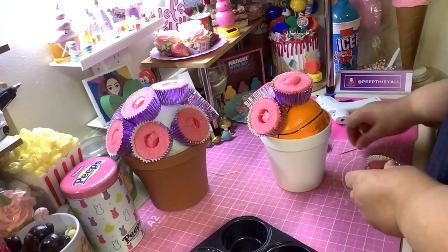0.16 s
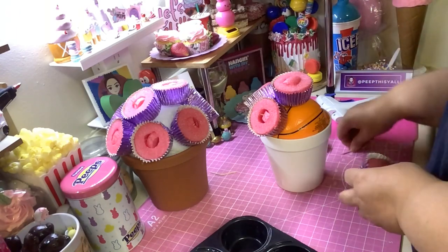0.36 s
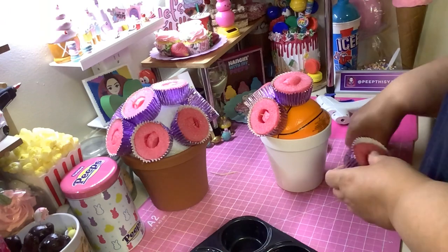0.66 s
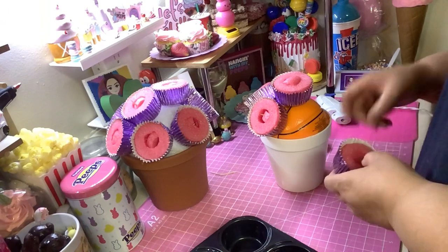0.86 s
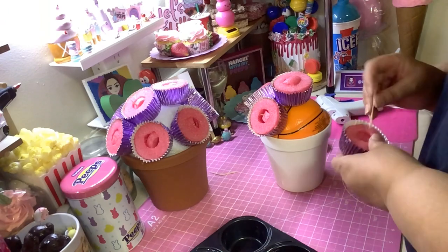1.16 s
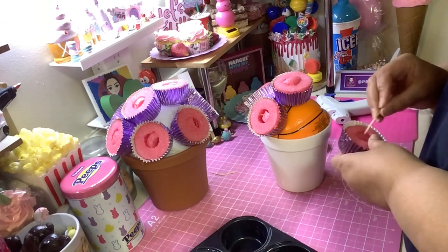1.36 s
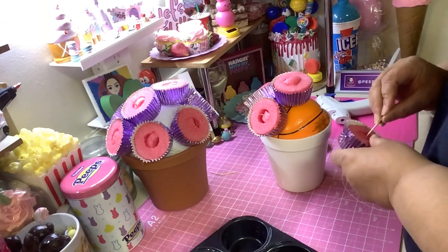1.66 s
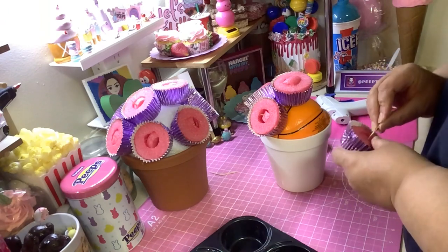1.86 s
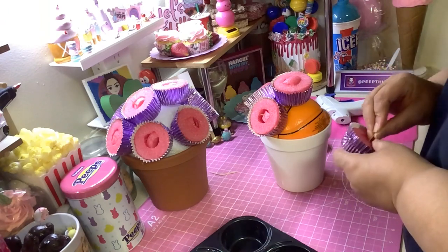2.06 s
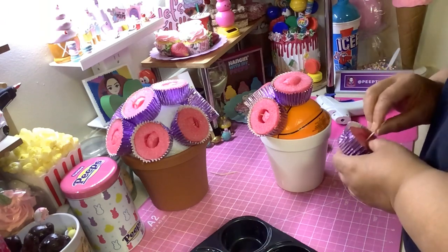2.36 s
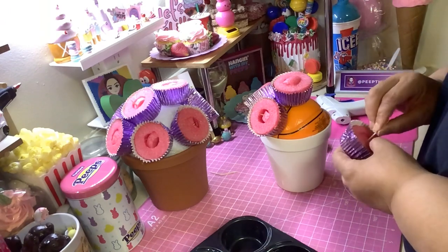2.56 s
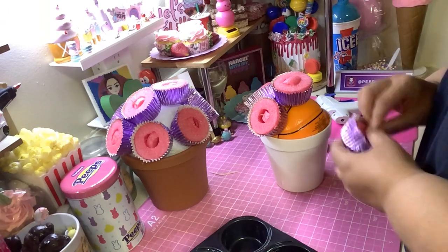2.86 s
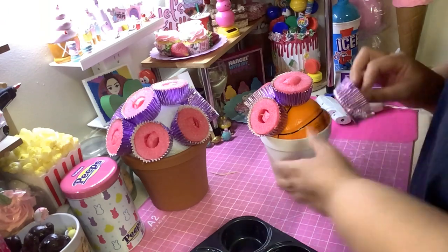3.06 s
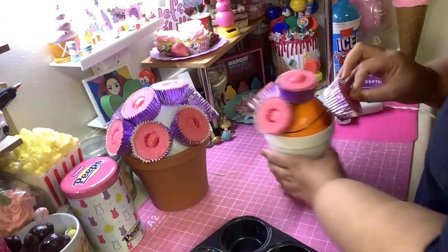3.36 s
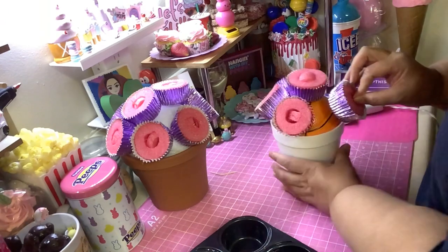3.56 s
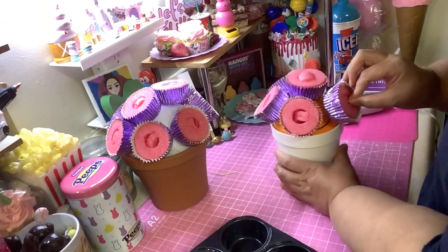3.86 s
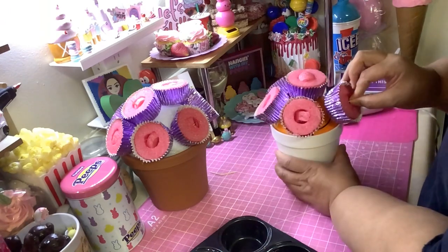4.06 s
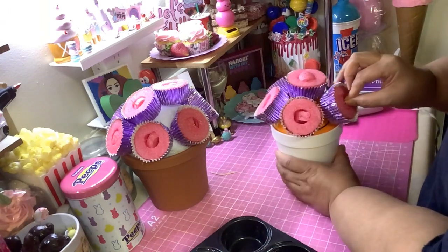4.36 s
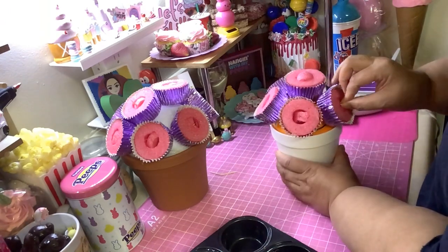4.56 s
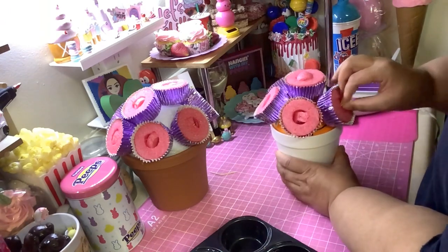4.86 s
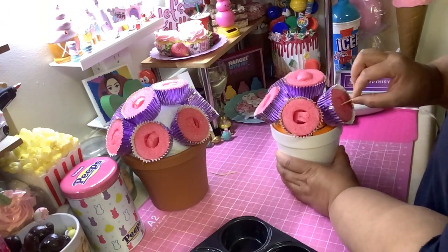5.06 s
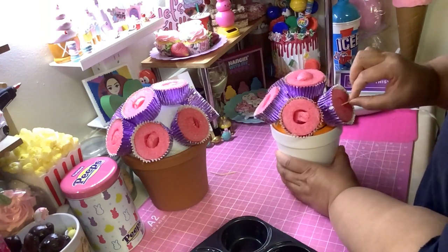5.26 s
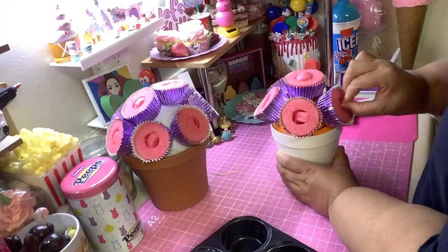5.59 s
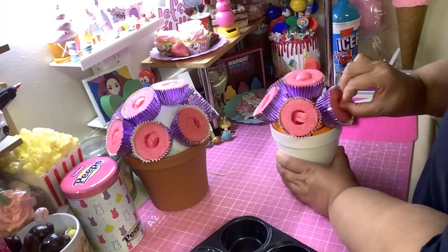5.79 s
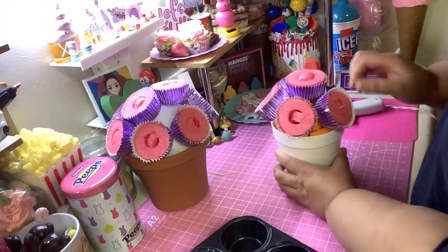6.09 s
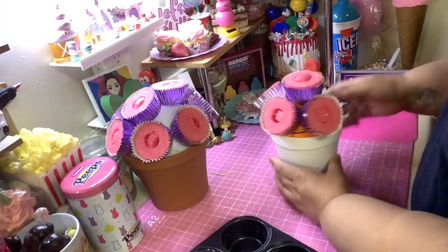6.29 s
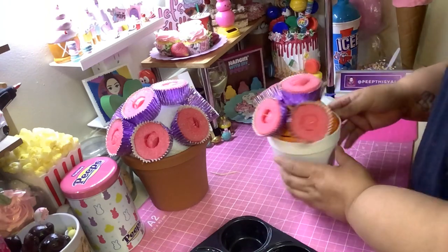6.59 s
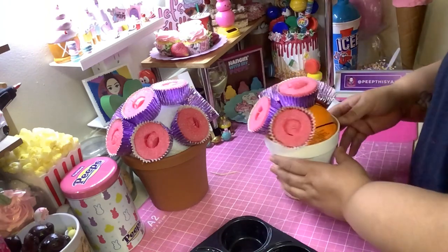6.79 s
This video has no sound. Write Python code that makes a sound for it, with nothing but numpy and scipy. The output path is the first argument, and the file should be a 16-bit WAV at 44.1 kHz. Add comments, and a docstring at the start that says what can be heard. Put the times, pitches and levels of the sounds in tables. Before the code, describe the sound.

Foil cupcake liners crinkle and snap in the fingers while a pot scuffs softly on a table in a quiet room.

```python
"""A small furnished room: foil cupcake liners are handled, pierced with a stick and pressed onto a ball
in a pot. Pleats snap over one by one, each a crack that rings the foil around it. Tiny slips under the
fingers rustle and sizzle, and the hollow cup colours all of the foil. Coarser slips grind under the pot
as it rubs on the table mat. The house murmurs and an appliance hums below."""
import sys
import numpy as np
from scipy import signal
from scipy.fft import rfft, irfft
from scipy.io import wavfile

SR = 44100
rng = np.random.default_rng(int(sys.argv[2]) if len(sys.argv) > 2 else 0)


def dump(signal):
    """Clip the signal to [-1, 1] and save it as 16-bit WAV at the path in sys.argv[1]."""
    limited = np.clip(np.atleast_2d(signal).T, -1, 1)
    pcm = np.round(limited * 32767).astype(np.int16)
    wavfile.write(sys.argv[1], SR, pcm)


N = 305683


def from_db(db):
    """Gain of a level in dB."""
    return 10 ** (np.asarray(db) / 20)


def rms_one(x):
    """Scaled to rms 1."""
    return x / np.sqrt(np.mean(x ** 2) + 1e-20)


def peak_one(x):
    """Scaled to peak 1."""
    return x / np.max(np.abs(x))


def colour(x, spectrum):
    """EQ through a curve of (Hz, dB) points; rms 1."""
    hz, db = np.transpose(spectrum)
    bins = np.maximum(np.fft.rfftfreq(N, 1 / SR), 1)
    curve_db = np.interp(np.log(bins), np.log(hz), db)
    return rms_one(irfft(rfft(x) * from_db(curve_db), N))


def band(x, low_hz, high_hz):
    """Causal band-pass."""
    return signal.sosfilt(signal.butter(3, [low_hz, high_hz], "band", fs=SR, output="sos"), x)


def resonate(x, hz, width_hz):
    """One resonance, gain 1 at its peak."""
    r = np.exp(-np.pi * width_hz / SR)
    gain = (1 - r * r) / 2
    return signal.lfilter([gain, 0, -gain], [1, -2 * r * np.cos(2 * np.pi * hz / SR), r * r], x)


def hollow(x, modes):
    """The sound plus the resonances that a hollow body adds to it."""
    return x + sum(from_db(db) * resonate(x, hz, width_hz) for hz, width_hz, db in modes)


def grains(per_s, spread_db):
    """Random tiny slips of uneven size and sign."""
    sizes = from_db(spread_db * np.minimum(rng.exponential(1, N), 5)) * rng.choice([-1, 1], N)
    return sizes * (rng.random(N) < per_s / SR)


def patches(slips, low_hz, high_hz, centre_hz, q, octaves, skirt_db, count):
    """Slips dealt to many small resonances; those near the moving centre are liveliest; rms 1."""
    dealt, out = rng.integers(0, count, N), 0
    for k, hz in enumerate(np.geomspace(low_hz, high_hz, count)):
        lively = np.exp(-(np.log2(hz / centre_hz) / octaves) ** 2) + from_db(skirt_db)
        ring = resonate(slips * (dealt == k) + 1e-18, hz, hz / q)
        out = out + lively * rms_one(resonate(ring, hz, 3 * hz / q))   # second pass darkens the skirts
    return rms_one(out)


def strokes(rows, fade_db_per_s, rest_hz, rest_db=-120):
    """Gestures swell, hold and fade over a resting level; returns their joint gain and centre in Hz."""
    swell_db = 26   # rise over the swell time, up to full strength
    t = np.arange(N) / SR
    power = np.full(N, from_db(2 * rest_db))
    weighted_pitch = power * np.log(rest_hz)
    for s, swell, hold, db, hz in rows:
        near = slice(max(round((s - 2 * swell) * SR), 0), round((s + hold + .25) * SR))
        swell_loss_db = swell_db * (s - t[near]) / max(swell, .002)
        fade_loss_db = fade_db_per_s * np.maximum(t[near] - s - hold, 0)
        stroke_power = from_db(2 * (db - np.maximum(swell_loss_db, fade_loss_db)))
        power[near] += stroke_power
        weighted_pitch[near] += stroke_power * np.log(hz)
    return np.sqrt(power), np.exp(weighted_pitch / power)


def background(murmur_db=-63.5, hum_db=-65.5, hum_hz=79.3, waver_width_hz=5.6):
    """Steady murmur of the house and an appliance hum whose level wavers."""
    # The murmur's spectrum. Each row: frequency in Hz, relative level in dB.
    murmur_curve = [(18, -48.5), (30, -23), (75, 7), (182, -6), (277, -1), (351, -12.5), (481, -7.5),
                    (624, -21), (711, -12), (1050, -29.5), (1270, -18), (2430, -26), (10500, -31),
                    (14000, -31.5), (15600, -43.5)]
    waver = resonate(rng.standard_normal(N + SR), hum_hz, waver_width_hz)
    waver = rms_one(resonate(waver, hum_hz, waver_width_hz)[SR:])   # skip the build-up
    hum = 3.0 * np.sin(2 * np.pi * hum_hz * np.arange(N) / SR) + waver
    murmur = colour(rng.standard_normal(N), murmur_curve)
    return from_db(murmur_db) * murmur + from_db(hum_db) * rms_one(hum)


def pot():
    """Coarse slips under the pot's foot shake pot and table, over a steady low background rumble."""
    # The pot nudged on the mat. Each row: moment of full strength, swell and hold in seconds,
    # level in dB, centre of the grind in Hz.
    nudges = [(0.216, 0.0072, 0.007, -49, 380), (0.29, 0.049, .03, -59, 360),
              (0.44, .08, 0.044, -58.5, 290), (1.7, 0.033, .01, -60.5, 470), (2.53, 0.057, .005, -71, 530),
              (2.59, .03, 0.0059, -49.5, 650), (3.3, .03, .04, -59, 399), (3.37, 0.084, 0.04, -49, 485),
              (3.415, 0.042, .02, -47, 253), (3.49, 0.061, 0.16, -60.5, 300),
              (3.76, .08, 0.0093, -52.5, 200), (3.9, 0.048, .15, -68, 220), (4.21, .06, .01, -57, 335),
              (4.32, .03, 0.044, -48, 345), (4.37, .03, .03, -50.5, 356), (4.45, .05, 0.2, -59, 280),
              (4.57, 0.083, 0.016, -49.5, 350), (4.8, .02, 0.0075, -56, 340), (4.9, .08, .02, -57.5, 300),
              (5.46, 0.016, 0.031, -52, 350), (5.6, 0.21, 0.013, -45, 370), (5.68, .03, 0.05, -59, 280),
              (5.92, .08, 0.092, -60.5, 260), (6.04, 0.077, .05, -55.5, 280), (6.2, .12, 0.035, -50, 220),
              (6.49, .06, .03, -55, 516), (6.54, .05, 0.038, -51, 430), (6.6, 0.063, 0.092, -55, 501),
              (6.81, 0.08, 0.11, -62, 240)]
    # The hollow of the pot. Each row: resonance in Hz, width in Hz, gain in dB.
    pot_modes = [(188, 200, -3), (380, 76, -1.5), (567, 99, 4)]
    gain, centre_hz = strokes(nudges, fade_db_per_s=249, rest_hz=240, rest_db=-66.5)
    slips = grains(1500, spread_db=2.5)
    grind = patches(slips, 122.6, 1100, centre_hz, q=5, octaves=0.55, skirt_db=-5.5, count=10)
    return gain * rms_one(hollow(grind, pot_modes))


def rustle():
    """Dense slips under the fingers ring patches of foil: the wider ones rustle, the smallest sizzle."""
    # Fingers on the foil. Each row: moment of full strength, swell and hold in seconds,
    # relative levels of rustle and sizzle in dB, centres of rustle and sizzle in Hz.
    touches = [(0.0, .01, .005, -64.5, -68.5, 2550, 9100), (0.22, 0.025, 0.018, -60, -57, 3460, 8200),
               (0.245, 0.023, .012, -57.5, -54, 3480, 8200), (0.292, 0.043, .03, -63, -63, 3525, 9400),
               (0.671, 0.15, .02, -82.5, -71, 2113, 8350), (0.766, .04, 0.035, -64.5, -63, 4600, 7900),
               (0.809, .05, 0.023, -59, -54.5, 4430, 7900), (1.681, .005, .02, -48.5, -42.5, 2347, 10400),
               (1.774, .03, .05, -63.5, -67, 2910, 8500), (1.943, 0.0057, .06, -51, -53, 3310, 7190),
               (2.013, .04, .01, -48.5, -55, 3180, 7000), (2.039, 0.0044, .004, -55, -41, 3330, 7700),
               (2.09, .02, .05, -67.5, -72, 3320, 7360), (2.154, .01, .045, -50, -62.5, 2710, 7180),
               (2.257, .05, .01, -54.5, -71, 3375, 7300), (2.347, .008, .03, -61.5, -71, 2497, 9400),
               (2.578, 0.006, .025, -29.5, -24.5, 3780, 7800), (2.66, 0.032, .06, -56, -56, 3456, 7870),
               (2.761, .03, .01, -46.5, -41, 4150, 7030), (2.84, 0.026, .06, -60.5, -56.5, 3300, 7900),
               (2.908, .015, .03, -54, -48.5, 2660, 7830), (3.008, .05, .01, -51.5, -53.5, 2510, 8200),
               (3.104, .025, .005, -44, -42, 3050, 8500), (3.166, .02, .05, -62.5, -75, 2304, 8500),
               (3.275, 0.019, .005, -60, -64.5, 2190, 7200), (3.296, .01, .005, -51.5, -50, 2153, 9000),
               (3.339, 0.028, .03, -58, -60, 2257, 10500), (3.4, 0.08, .06, -57, -66.5, 2023, 7300),
               (4.064, .005, .005, -64, -53.5, 2000, 6700), (4.199, .003, 0.0092, -58, -46, 3645, 9000),
               (4.228, 0.0092, .01, -73, -56, 4200, 9700), (4.293, 0.011, 0.017, -61, -45, 3700, 13000),
               (4.311, .01, .015, -50, -43, 3170, 11800), (4.35, 0.022, 0.039, -56.5, -53.5, 2114, 10700),
               (4.432, .03, .02, -54.5, -50.5, 2500, 11000), (4.47, .02, .04, -64.5, -59, 2620, 11700),
               (4.533, 0.016, .02, -53, -45, 2450, 10600), (4.568, .01, .02, -49, -49.5, 2400, 10200),
               (4.655, 0.028, .02, -66.5, -80, 2420, 9480), (4.71, 0.022, .005, -56.5, -66, 2460, 11050),
               (4.794, 0.0023, .005, -52.5, -49.5, 2152, 9700), (4.839, 0.017, 0.027, -65, -65, 2287, 9600),
               (4.869, .01, 0.012, -56, -65, 2196, 9200), (4.976, .01, 0.027, -58, -78.5, 3000, 9000),
               (5.103, 0.034, 0.033, -58, -72, 3126, 8900), (5.19, 0.033, 0.055, -65.5, -90, 2680, 8700),
               (5.466, .03, .04, -44.5, -46, 3000, 8900), (5.556, .06, 0.019, -41.5, -38.5, 2750, 9120),
               (5.593, .03, 0.012, -41.5, -37.5, 3112, 8980), (5.625, .015, 0.0062, -46.5, -42, 2993, 9010),
               (5.678, 0.011, .005, -53.5, -59, 2690, 9100), (5.698, .03, .02, -59.5, -56, 3600, 9430),
               (5.891, 0.021, .005, -65.5, -83.5, 1650, 8700), (5.935, .02, 0.024, -57.5, -65, 3000, 7180),
               (6.011, .005, .005, -56, -65.5, 2520, 8800), (6.06, 0.028, .08, -65, -70, 2044, 8000),
               (6.174, 0.093, .13, -63, -71, 2117, 8300), (6.494, 0.044, 0.027, -70, -89.5, 3320, 6590),
               (6.514, 0.0036, 0.0032, -56, -55, 3300, 6500), (6.55, .02, .03, -63.5, -78.5, 2400, 6440),
               (6.629, 0.062, 0.026, -58, -77, 2610, 7310), (6.684, .03, .05, -66.5, -89.5, 2520, 7300),
               (6.93, .1, .01, -62, -79, 1700, 8760)]
    s, swell, hold, rustle_db, sizzle_db, rustle_hz, sizzle_hz = np.transpose(touches)
    wide_rows = zip(s, swell, hold, rustle_db, rustle_hz)
    small_rows = zip(s, swell, hold, sizzle_db, sizzle_hz)
    wide_gain, wide_hz = strokes(wide_rows, fade_db_per_s=357, rest_hz=2500)
    small_gain, small_hz = strokes(small_rows, fade_db_per_s=419, rest_hz=8500)
    slips = grains(9000, spread_db=3.5)
    body = patches(slips, 1300, 5600, wide_hz, q=12, octaves=0.87, skirt_db=-6, count=14)
    sizzle = patches(slips, 5900, 15700, small_hz, q=12, octaves=0.64, skirt_db=-8, count=10)
    return wide_gain * body + small_gain * sizzle


def snaps(crack=4.23, q=3.5):
    """A crack, then a dying shiver: flipping pleats ring the foil around them, and once the pot thuds."""
    # Pleats snapping over, and one dull thud of the pot near 5.9 s. Each row: start in seconds,
    # relative peak of the ring in dB, its pitch in Hz, treble and thud in dB against the ring,
    # seconds for the shiver to fall 60 dB.
    hits = [(0.2125, -42.5, 1290, -15, -5, 0.045), (0.306, -42, 5500, -6, -15, 0.043),
            (1.6693, -26.5, 4600, 5.5, -32, 0.029), (1.6831, -14.5, 3050, 0, -21, 0.033),
            (1.8067, -41.5, 3570, -9, -17.5, 0.07), (1.8177, -34, 3570, -8, -36, 0.031),
            (1.8742, -41.5, 4370, -13, -31, 0.033), (1.9038, -33, 3670, -3.5, -36, 0.035),
            (1.931, -20.5, 3570, -2.5, -23, 0.027), (1.9813, -35.5, 3520, -12, -9, 0.053),
            (2.034, -23.5, 3260, -14, -28, 0.018), (2.0501, -20.5, 3280, -22, -28, 0.0091),
            (2.1155, -43, 3610, -25, -8, 0.031), (2.154, -39, 1680, -21, -6.5, 0.1),
            (2.2003, -31.5, 3700, -33, -16, 0.028), (2.2507, -40, 3800, -10, -12, 0.034),
            (2.3433, -40, 4100, -11, -4.5, 0.02), (2.4442, -28, 4130, -9, -20, 0.026),
            (2.5157, -30, 2850, -34, -5, 0.026), (2.5766, -5, 2890, -8, -25.5, 0.02),
            (2.7503, -33, 5260, -15, -12, 0.022), (2.7636, -27, 4550, -23, -19, 0.049),
            (2.7869, -27.5, 3970, -9, -20, 0.016), (2.8498, -46, 4740, -11, -5.5, 0.047),
            (2.871, -40, 3800, -8, -6, 0.075), (2.9119, -34, 2550, 0, -14, 0.036),
            (3.0784, -40.5, 1470, -20, -34, 0.037), (3.1051, -27, 4430, 5.5, -13.5, 0.051),
            (3.2962, -29, 1680, -20, -14, 0.0097), (3.948, -33.5, 4270, -1.5, -28, 0.024),
            (4.0612, -53, 1480, -19, 1, 0.015), (4.0754, -30, 2300, -21, -7.5, 0.017),
            (4.2, -39.5, 2300, 5, -30, 0.013), (4.2102, -42.5, 2250, -4, -21, 0.012),
            (4.235, -38, 5620, 1, -31, 0.011), (4.26, -53, 5840, 15, -21, 0.022),
            (4.2895, -50, 3150, 17, -13, 0.037), (4.312, -34.5, 4430, 11.5, -5.5, 0.038),
            (4.3342, -34, 1610, 5.5, -24, 0.067), (4.368, -38, 1720, 4, -11, 0.041),
            (4.4251, -41.5, 1410, 11, -21, 0.02), (4.4647, -44.5, 2100, 13.5, -18, 0.036),
            (4.536, -40, 2020, 12, -7, 0.0094), (4.5685, -27, 2200, 5.5, -33, 0.038),
            (4.595, -34.5, 2500, -21, -31, 0.047), (4.69, -53.5, 2120, 10.5, -28, 0.026),
            (4.797, -40, 2020, 6, -6, 0.026), (4.8642, -42.5, 1650, -8, -12, 0.016),
            (5.463, -32.5, 2550, 9, -6, 0.033), (5.5197, -30.5, 4140, 5.5, -33, 0.047),
            (5.5228, -26, 2650, 2.5, -11, 0.026), (5.5967, -26, 5130, -5, -12, 0.051),
            (5.6032, -28, 1460, -11, -24, 0.015), (5.68, -32, 2930, -12, -22, 0.023),
            (5.703, -36, 3120, 9, -15, 0.028), (5.7167, -34.5, 5110, 5, -20, 0.017),
            (5.73, -40, 2040, -15, -6, 0.028), (5.8953, -56.5, 2010, -15, 11.5, 0.017),
            (6.0123, -38, 3200, -5, 1.5, 0.019), (6.5216, -42, 2890, -28, -3, 0.019)]
    out, length = np.zeros(N + SR), SR // 8
    age = np.arange(length) / SR
    shivers = rng.standard_normal((len(hits), 2, length))   # the treble shivers on its own
    for (s, db, hz, treble_db, thud_db, t60), shiver in zip(hits, shivers):
        force = shiver * from_db(-60 * age / t60)
        force[:, 0] = crack
        ring = peak_one(band(force[0] + q * resonate(force[0], hz, hz / q), 1200, 7400))
        treble = from_db(treble_db) * peak_one(band(force[1], 5500, 16000))
        thud = from_db(thud_db) * peak_one(band(force[0], 300, 1000))
        at = round(s * SR)
        out[at:at + length] += from_db(db) * (ring - treble + thud)
    return out[:N]


def room(x, t60_s=0.22, first_echo_s=0.00083, gain_db=-6.5):
    """Dense echoes that start after the nearest surfaces and die away."""
    age = np.arange(SR // 3) / SR
    onset = np.clip(age / first_echo_s - 1, 0, 1)
    echoes = rng.standard_normal(len(age)) * from_db(-60 * age / t60_s) * onset
    return from_db(gain_db) * signal.fftconvolve(x, echoes / np.linalg.norm(echoes))[:N]


def scene(foil_gain_db=-4.5, rustle_send_db=-5):
    """The foil takes the colour of the cup and fills the room; grind and background stay dry."""
    # The hollow of the pleated cup. Each row: resonance in Hz, width in Hz, gain in dB.
    cup_modes = [(1850, 1000, -3), (2840, 290, -5), (4100, 350, -4), (5174, 180, -4.5), (7820, 770, -17),
                 (9400, 500, -11)]
    cracks = hollow(snaps(), cup_modes)
    fingers = hollow(rustle(), cup_modes)
    reverb = room(cracks + from_db(rustle_send_db) * fingers)
    foil = from_db(foil_gain_db) * (cracks + fingers + reverb)
    return (foil + pot() + background())[None]


def record(dry, low_cut_hz=51, top_cut_hz=16600):
    """A small microphone without deep bass; the top is cut steeply."""
    thin = signal.sosfilt(signal.butter(3, low_cut_hz, "high", fs=SR, output="sos"), dry)
    return signal.sosfilt(signal.cheby2(12, 60, top_cut_hz, fs=SR, output="sos"), thin)


dry = scene()
out = record(dry)
dump(out)
```